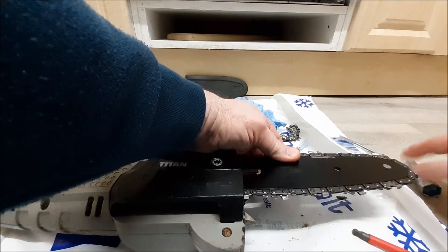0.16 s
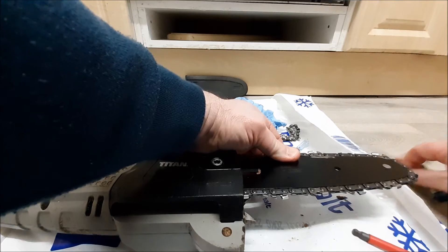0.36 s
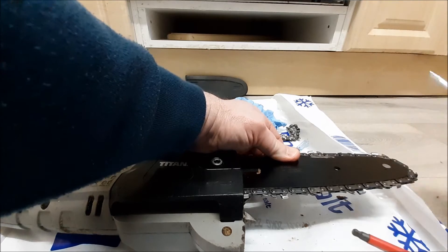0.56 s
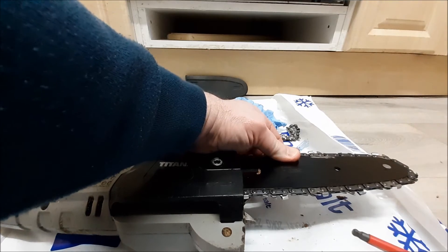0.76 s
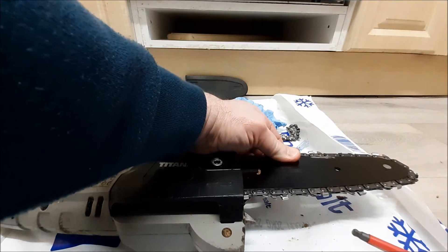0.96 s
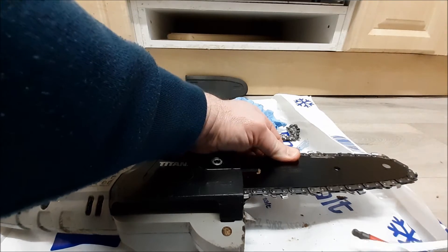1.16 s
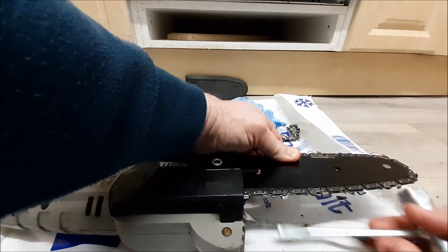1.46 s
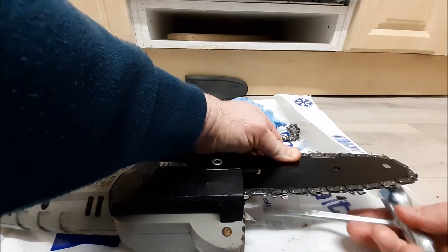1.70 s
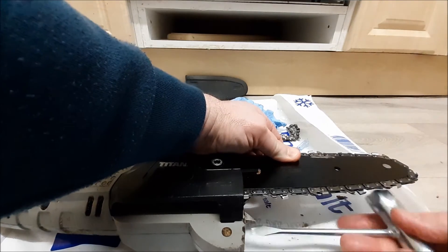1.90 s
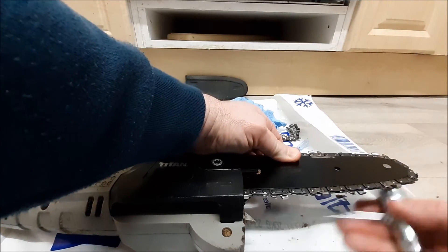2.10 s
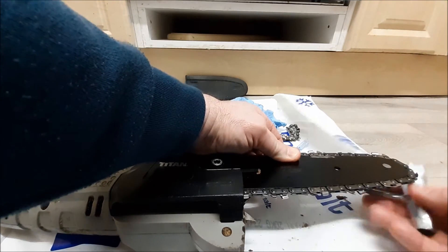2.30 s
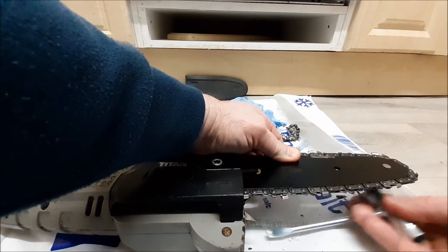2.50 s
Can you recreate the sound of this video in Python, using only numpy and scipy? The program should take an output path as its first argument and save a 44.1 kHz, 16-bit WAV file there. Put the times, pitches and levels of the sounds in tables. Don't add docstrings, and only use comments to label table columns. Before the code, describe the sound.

A loose saw chain rattles on its bar, close to a phone in a kitchen with low appliance hum. A knock and click at 0.35 s, then soft sleeve rustle swelling to about 1.25 s. From 1.5 s small clinks gather; bright sharp ticks at 1.8 and 2.0 s, scraping and dense clatter from 2.07 s, the hardest clank at 2.36 s, then fading knocks and rustle until about 2.65 s.

```python
import sys
import numpy as np
from scipy import signal
from scipy.fft import rfft, irfft, next_fast_len
from scipy.io import wavfile
from scipy.ndimage import uniform_filter1d

SR = 44100
rng = np.random.default_rng(int(sys.argv[2]) if len(sys.argv) > 2 else 0)


def attenuation_scalar(level_db):
    decades = np.asarray(level_db, float) / 20
    return 10 ** decades


def dump(signal):
    limited = np.clip(np.atleast_2d(signal).T, -1, 1)
    pcm = np.round(limited * 32767).astype(np.int16)
    wavfile.write(sys.argv[1], SR, pcm)


N = 116865
PORT_LAG_S = .0002
STEEL_LAG_S, BAR_LAG_S = 0, .00027


def unit(x):
    return x / np.sqrt(np.mean(x ** 2))


def colour(x, points):
    hz, level_db = np.array(points, float).T
    size = next_fast_len(x.shape[-1])
    f = np.maximum(np.arange(size // 2 + 1) * SR / size, 1)
    gain = attenuation_scalar(np.interp(np.log(f), np.log(hz), level_db, left=-80))
    return irfft(rfft(x, size) * gain, size)[..., :x.shape[-1]]


def walk(rate_hz):
    hold = int(SR / rate_hz)
    steps = np.repeat(rng.standard_normal(N // hold + 1), hold)
    return 2.4 * uniform_filter1d(uniform_filter1d(steps, hold), hold)[:N]


def band(x, hz, width_hz):
    b, a = signal.iirpeak(min(hz, .45 * SR), hz / width_hz, fs=SR)
    return signal.lfilter(b, a, x)


def strokes(rows, power):
    t = np.arange(N) / SR
    energy = np.zeros(N)
    for start_s, peak_s, end_s, level_db in rows:
        ramp = np.interp(t, [start_s, peak_s, end_s], [0, 1, 0])
        energy += (attenuation_scalar(level_db) * np.sin(np.pi / 2 * ramp) ** power) ** 2
    return np.sqrt(energy)


def ports(x, alike, lag_s, pan_db):
    right = alike * np.roll(x[0], int(lag_s * SR)) + np.sqrt(1 - alike ** 2) * x[1]
    return np.array([x[0] * attenuation_scalar(pan_db / 2), right * attenuation_scalar(-pan_db / 2)])


def pairs(count, size):
    alike = 0.49
    noise = rng.standard_normal((count, 2, size))
    noise[:, 1] = alike * noise[:, 0] + np.sqrt(1 - alike ** 2) * noise[:, 1]
    return noise


def add(out, start_s, burst, peak_db, pan_db, lag_s):
    gain = attenuation_scalar([[peak_db + pan_db / 2], [peak_db - pan_db / 2]])
    burst = burst / np.abs(burst).max() * gain
    for port, at_s in enumerate([start_s, start_s + lag_s]):
        i = int(at_s * SR)
        n = min(burst.shape[1], N - i)
        out[port, i:i + n] += burst[port, :n]


def room():
    # hz, level_db
    room_colour = [(40, -28), (70, -11), (110, -7.5), (300, -5), (550, -18.5), (2000, -27.5), (9500, -28),
                   (16000, -25.5)]
    # pitch_hz, width_hz, level_db
    room_modes = [
        (96.1, 3.4, -63),
        (173, 45, -58),
        (218.5, 19, -65),
        (318.7, 3.9, -63.5),
    ]
    noise = rng.standard_normal((2, N))
    bed = unit(colour(noise, room_colour)) * attenuation_scalar(-54.5)
    for hz, width_hz, level_db in room_modes:
        bed = bed + unit(band(noise, hz, width_hz)) * attenuation_scalar(level_db)
    low = band(bed, 176, 440)
    flicker = attenuation_scalar(.7 * walk(14))
    return ports(low, 1.0, 0, 3.3) * flicker + ports(bed - low, 0.053, 0, 0.11)


def shift():
    # start_s, peak_s, end_s, level_db
    moves = [
        (.33, .38, 0.3, -58),
        (1.49, 1.52, 1.622, -51),
        (1.7, 1.76, 1.92, -46.5),
        (1.9, 1.93, 2.01, -47.5),
        (2.05, 2.14, 2.33, -45),
        (2.24, 2.3, 2.39, -39.5),
        (2.33, 2.38, 2.56, -47.5),
        (2.58, 2.64, 2.67, -47.5),
    ]
    rumble_colour = [(30, -5), (70, 2), (200, 5), (400, -5), (900, -20.0)]  # hz, level_db
    rumble = unit(colour(rng.standard_normal((2, N)), rumble_colour))
    return ports(rumble * strokes(moves, 0.8) * attenuation_scalar(0.6 * walk(30.032)), 1.0, 0, 0.91)


def slide():
    # start_s, peak_s, end_s, level_db
    rubs = [
        (.2, .36, 0.39, -48.5),
        (.38, .44, 0.42, -59),
        (.53, .6, .68, -46),
        (.78, 1.0, 1.1, -45),
        (1.0, 1.24, 1.474, -39),
        (1.3, 1.45, 1.65, -49.5),
        (1.69, 1.74, 1.76, -44),
        (2.35, 2.41, 2.48, -37),
        (2.44, 2.59, 2.695, -43),
    ]
    # hz, level_db
    cloth = [(290, -32), (500, -4.5), (613, -5.5), (1480, -11), (2100, -3), (3100, -7.5), (4300, -4.5),
             (5390, -4), (10400, -4.5), (16000, -10.5)]
    # start_s, peak_s, end_s, level_db
    scrapes = [(2.005, 2.02, 3.7, -53.5), (2.07, 2.12, 2.49, -37.5), (2.12, 2.22, 2.25, -31.5),
               (2.23, 2.26, 2.35, -32.5)]
    steel = [(1000, -3.5), (3000, -3.0), (6000, -5.5), (8300, -4.5), (9600, -12.0), (12000, -3),
             (14500, -7.5), (16000, -20)]
    shivers = [(1.812, 1.825, 1.922, -41), (2.005, 2.02, 2.08, -47.5)]
    chatters = [(2.355, 2.365, 2.48, -42.5), (2.42, 2.44, 2.46, -41)]
    grain = rng.standard_normal((2, 2, N)) * attenuation_scalar(2.0 * rng.standard_normal((2, 2, N)))
    hiss = unit(colour(grain[0], cloth)) * strokes(rubs, 0.91) * attenuation_scalar(0.51 * walk(60.26))
    grit = unit(colour(grain[1], steel)) * strokes(scrapes, 1.3) * attenuation_scalar(0.6 * walk(450))
    shiver = unit(band(band(grain[0], 10000, 6300), 9200, 7500))
    grit = grit + shiver * strokes(shivers, 1.9) * attenuation_scalar(1.1 * walk(200))
    chatter = unit(band(band(grain[0], 8600, 900), 8200, 1200))
    grit = grit + chatter * strokes(chatters, 1.5)
    return ports(hiss, 0.16, PORT_LAG_S, -1.9) + ports(grit, 0.13, PORT_LAG_S, -1.9)


SHAFT_HZ, NECK_HZ, SOCKET_HZ, RIM_HZ, TIP_HZ = 2258, 5505, 8868, 8290, 14260


def rings():
    # start_s, pitch_hz, level_db, t60_s
    partials = [(.705, SOCKET_HZ, -61.5, 0.67), (0.999, SOCKET_HZ, -41.5, 0.16),
                (1.635, NECK_HZ, -45.5, 0.11), (1.727, SOCKET_HZ, -49, 0.13), (1.817, 10260, -16, .016),
                (1.8152, 9100, -18, .014), (1.817, 12800, -19, .03), (2.011, TIP_HZ, -38, 0.12),
                (2.0768, 1470, -13, 0.017), (2.0876, 1440, -20, 0.018), (2.077, 4700, -17.5, 0.012),
                (2.0763, 3080, -20, 0.017), (2.079, 6850, -40, 0.1), (2.0776, 10300, -38, 0.033),
                (2.135, 4260, -26.5, 0.015), (2.3585, 13100, -46, .1), (2.4235, 6250, -27, 0.012),
                (2.423, 11300, -36, .015), (2.439, 6070, -27, 0.0064), (2.4385, 11800, -29, 0.017),
                (2.434, SOCKET_HZ, -38, 0.083), (2.0772, 8900, -39, .14), (2.0777, NECK_HZ, -40, 0.27),
                (2.0785, SHAFT_HZ, -25.5, 0.16), (2.3576, RIM_HZ, -8.5, 0.012), (2.359, RIM_HZ, -38, .15),
                (2.358, SOCKET_HZ, -33, 0.15), (2.358, TIP_HZ, -30, .03), (2.375, 1393, -32.5, 0.2),
                (2.40, SHAFT_HZ, -42, 0.29), (2.441, NECK_HZ, -36, 0.12)]
    out, t = np.zeros((2, N)), np.arange(12000) / SR
    for start_s, hz, level_db, t60_s in partials:
        phase = rng.random() + np.array([[0], [.26]])
        decay = np.exp(-np.log(1000) * t / t60_s)
        onset = 1 - np.exp(-t / 0.00028)
        tone = np.sin(2 * np.pi * (hz * t + phase)) * decay * onset
        add(out, start_s, tone, level_db + 0.5, -3.0, STEEL_LAG_S)
    return out * attenuation_scalar(2.5 * walk(120))


def knocks():
    # start_s, peak_db, pitch_hz
    blows = [(.017, -43.5, 570), (0.349, -21.5, 1030), (0.373, -35.5, 486), (1.512, -30, 1180),
             (1.522, -37, 1040), (1.551, -28.5, 1360), (1.626, -38.5, 1400), (1.634, -29.5, 1400),
             (1.709, -33.5, 1320), (1.722, -33, 1500), (1.732, -28, 1450), (1.738, -32, 1420),
             (1.744, -27, 1370), (1.75, -33.5, 1470), (1.758, -37.5, 423), (1.817, -31.5, 1400),
             (1.833, -32.5, 915), (1.929, -37.5, 1320), (1.989, -32, 1176), (2.039, -37, 550),
             (2.0775, -27, 1570), (2.087, -28, 1510), (2.118, -27.5, 1160), (2.136, -28, 810),
             (2.139, -22, 1480), (2.19, -28, 2500), (2.154, -29, 1200), (2.193, -30, 1190),
             (2.203, -19, 1520), (2.207, -19.5, 2060), (2.217, -32, 490), (2.235, -28, 1290),
             (2.264, -19.5, 2220), (2.289, -18, 940), (2.294, -19, 790), (2.3, -22, 670),
             (2.303, -19.5, 730), (2.308, -21, 1170), (2.3577, -12.5, 1160), (2.424, -21.5, 975),
             (2.432, -27, 620), (2.436, -33, 1300), (2.47, -31.5, 1080), (2.519, -43, 750),
             (2.613, -48, 770), (2.581, -35.5, 1060), (2.631, -32.5, 750)]
    out, t = np.zeros((2, N)), np.arange(3000) / SR
    for (start_s, peak_db, hz), noise in zip(blows, pairs(len(blows), len(t))):
        hit = (t == 0) * 5.4 + noise * np.exp(-t / 0.0031)
        rattle = hit + noise * attenuation_scalar(-9) * np.exp(-t / 0.023)
        body = band(rattle, .8 * hz, hz)
        for _ in range(2):
            body = band(body, .8 * hz, 1.5 * hz)
        mode = band(band(hit, hz, .4 * hz), hz, .7 * hz)
        thud = attenuation_scalar(-2.0) * band(rattle, 284, 420)
        add(out, start_s, mode + body + thud, peak_db + 4.0, 3.5, BAR_LAG_S)
    return out


def drag():
    # start_s, peak_s, end_s, level_db; the first, long and faint, is a dull murmur of the room
    pulls = [(-.1, .02, 1.8, -57.5), (.15, .3, 0.49, -54.5), (.345, .355, 0.43, -42.5),
             (1.49, 1.53, 2, -58), (1.69, 1.74, 1.827, -41), (1.8, 1.9, 2.21, -50), (2.07, 2.15, 2.31, -36),
             (2.17, 2.22, 2.4, -37.5), (2.27, 2.305, 2.35, -31), (2.34, 2.385, 2.48, -35.5),
             (2.4, 2.44, 2.51, -42.5), (2.5, 2.6, 2.63, -47)]
    # hz, level_db
    bar_colour = [(180, -47), (300, -21), (508, -10), (621, -15), (778, 1), (849, -10), (1820, -6.5),
                  (3050, -14.5), (6000, -20), (7800, -58), (13200, -120)]
    links_per_s, spread_db = 1500, 4.5
    hit = rng.random((2, N)) < links_per_s / SR
    strength = attenuation_scalar(spread_db * np.minimum(rng.exponential(size=(2, N)), 3))
    clicks = unit(hit * strength * rng.standard_normal((2, N)))
    friction = .7 * rng.standard_normal((2, N))
    body = unit(colour(clicks + friction, bar_colour))
    return ports(body * strokes(pulls, 1.1) * attenuation_scalar(1.3 * walk(90)), 0.38, PORT_LAG_S, 0.83)


def ticks():
    # start_s, peak_db, colour_hz
    cracks = [(0.3505, -21.5, 3720), (1.5444, -38, 5800), (1.5526, -28.5, 9100), (1.6351, -26, 8400),
              (1.6639, -25, 4460), (1.71, -32, 8350), (1.726, -29.5, 6300), (1.733, -25, 8700),
              (1.8159, -10, 12600), (2.01, -11.5, 14600), (2.0707, -27, 9100), (2.0773, -23, 12500),
              (2.0773, -14, 4260), (2.0875, -22, 3700), (2.0954, -29, 7000), (2.1174, -21, 4340),
              (2.1362, -26, 5000), (2.153, -26, 5560), (2.2025, -22, 4960), (2.2505, -13, 10400),
              (2.259, -31, 12000), (2.270, -20.5, 5000), (2.291, -21.5, 3600), (2.434, -19, 6130),
              (2.472, -33, 3980), (.527, -38, 11500), (2.358, -8, 8600), (2.3637, -21, 4050),
              (2.402, -23, 12000), (2.4237, -21, 8700), (2.441, -19, 8900)]
    out, t = np.zeros((2, N)), np.arange(2600) / SR
    decay = np.exp(-t / .001) + attenuation_scalar(-25) * np.exp(-t / .012)
    for (start_s, peak_db, hz), noise in zip(cracks, pairs(len(cracks), len(t))):
        crack = (t == 0) * 1.5 + noise * decay
        burst = band(crack, hz, 0.15 * hz) + attenuation_scalar(1) * band(crack, hz, 0.67 * hz)
        burst = burst + attenuation_scalar(-15) * np.diff(crack, prepend=0)
        add(out, start_s + .0004, burst, peak_db + 2.5, -3.5, STEEL_LAG_S)
    return out


def echo(hits):
    t60_s, level_db = 0.53, -15
    t = np.arange(int(.3 * SR)) / SR
    tail = rng.standard_normal((2, len(t))) * np.exp(-np.log(1000) * t / t60_s) * (t > .003)
    tail = tail / np.sqrt(np.sum(tail[0] ** 2))
    return attenuation_scalar(level_db) * signal.fftconvolve(hits, tail, axes=1)[:, :N]


def scene():
    hits = ticks() + knocks()
    return hits + echo(hits) + rings() + slide() + drag() + shift() + room()


def narrow(x):
    # start_s, end_s, share of patches kept wide
    spans = [
        (.78, 1.54, .13),
        (1.57, 1.63, .3),
        (1.76, 1.81, .6),
        (1.83, 2.0, .1),
        (2.02, 2.07, .6),
        (2.09, 2.14, .4),
        (2.46, 2.62, .45),
    ]
    fold_hz, patch_hz, patch_s = 4700, 500, .06
    mid, side = (x[0] + x[1]) / 2, (x[0] - x[1]) / 2
    f, t, z = signal.stft(side, SR, nperseg=1024, noverlap=768)
    row = (f / patch_hz).astype(int)
    column = t[None] / patch_s + rng.random(row[-1] + 1)[row, None]
    column = column.astype(int)
    chance = rng.random((row[-1] + 1, column.max() + 1))[row[:, None], column]
    share = np.full(len(t), 9.0)
    for start_s, end_s, kept in spans:
        share[(t > start_s) & (t < end_s)] = kept
    favour = np.where((f > 7500) & (f < 12500), 1.6, .6)[:, None]
    wide = (chance < share * favour) | (f < fold_hz)[:, None]
    side = signal.istft(z * wide, SR, nperseg=1024, noverlap=768)[1][:N]
    return np.array([mid + side, mid - side])


def top_cut(x):
    return signal.sosfilt(signal.butter(12, 17050, fs=SR, output="sos"), x)


def record(dry):
    clipped = np.clip(dry, -.95, .95)
    x = signal.sosfilt(signal.butter(2, 66, "high", fs=SR, output="sos"), clipped)
    x = signal.sosfilt(signal.ellip(8, .2, 42, 15750, fs=SR, output="sos"), x)
    return top_cut(narrow(x))


dry = scene()
out = record(dry)
dump(out)
```